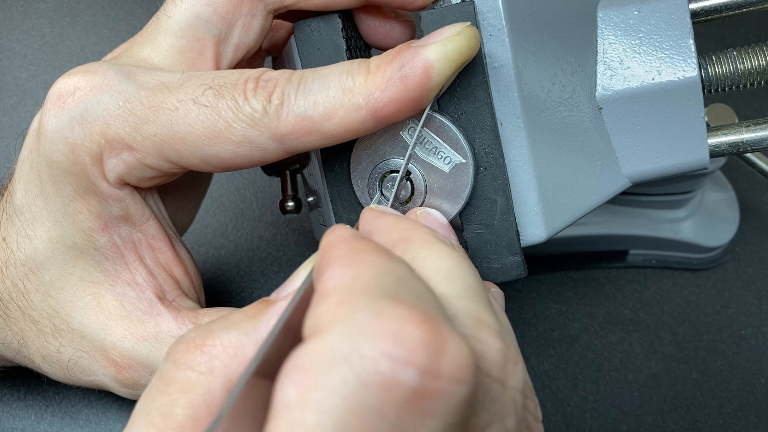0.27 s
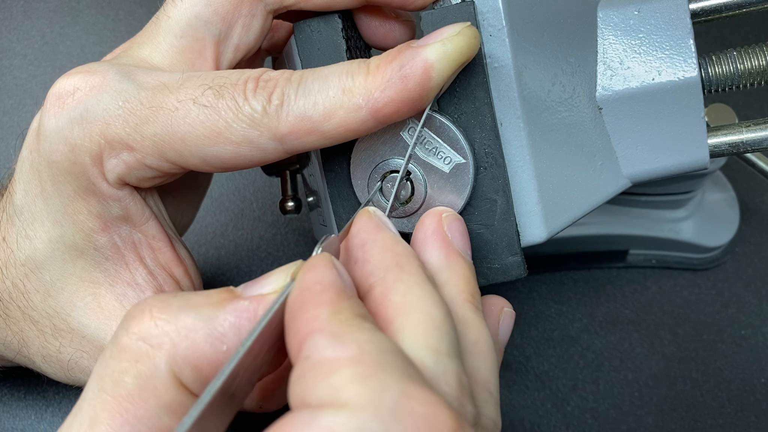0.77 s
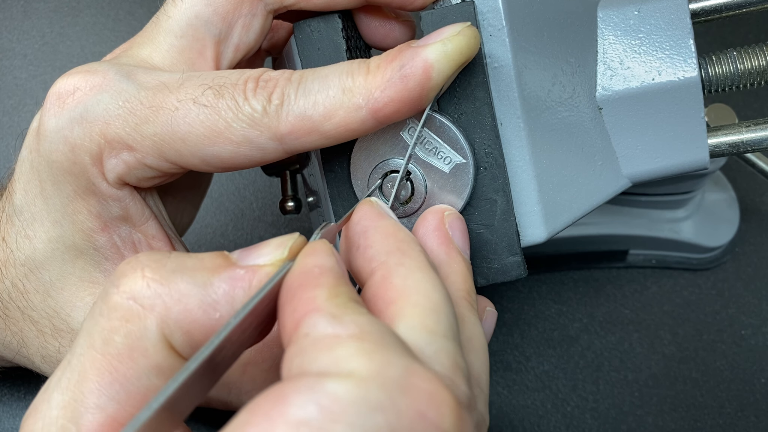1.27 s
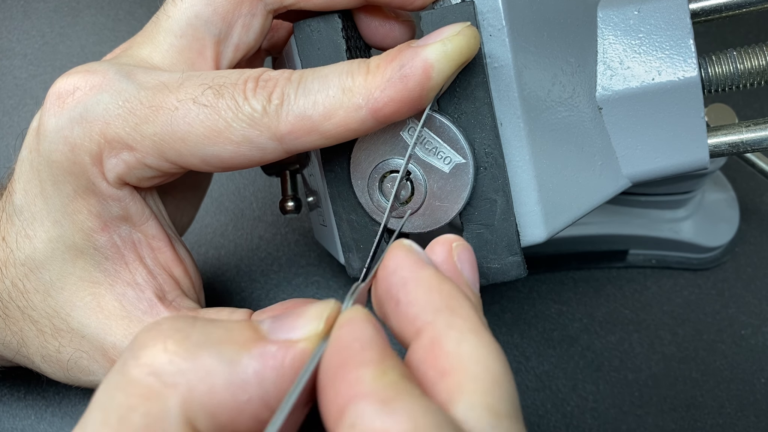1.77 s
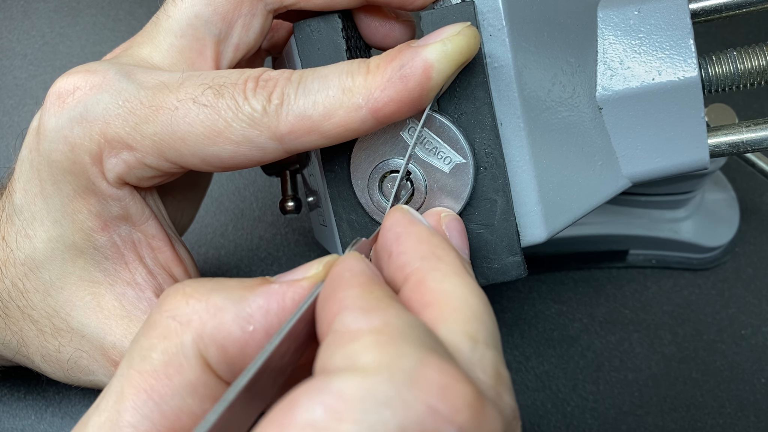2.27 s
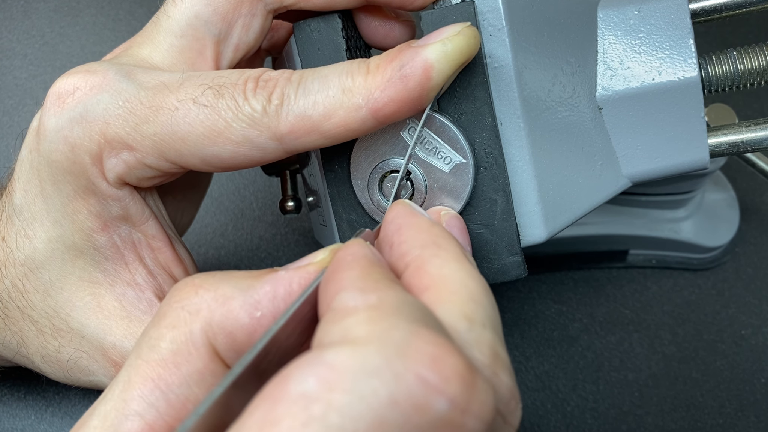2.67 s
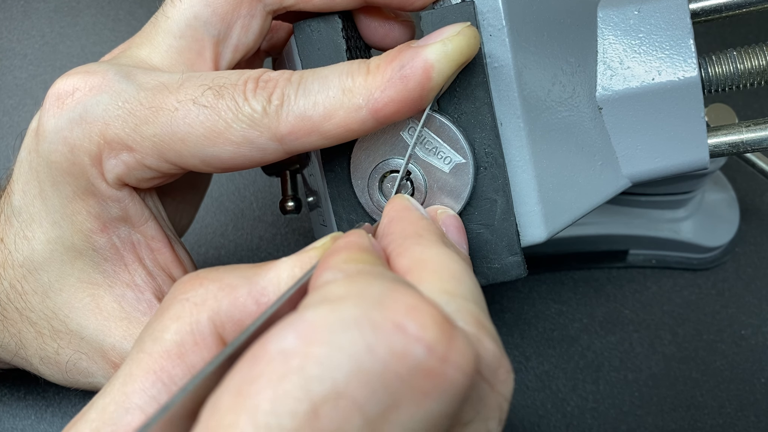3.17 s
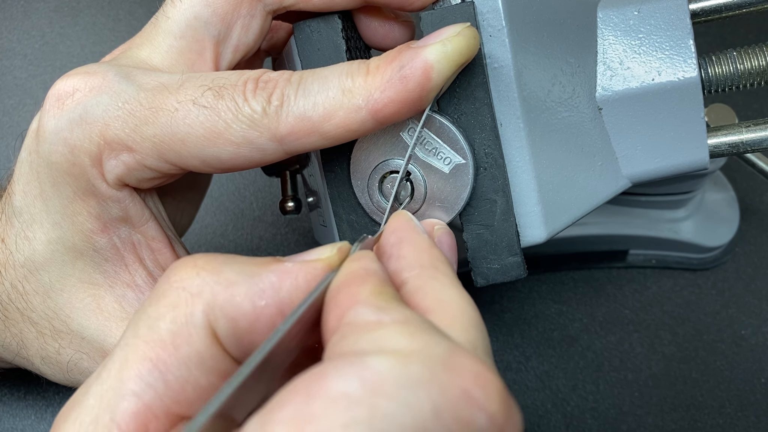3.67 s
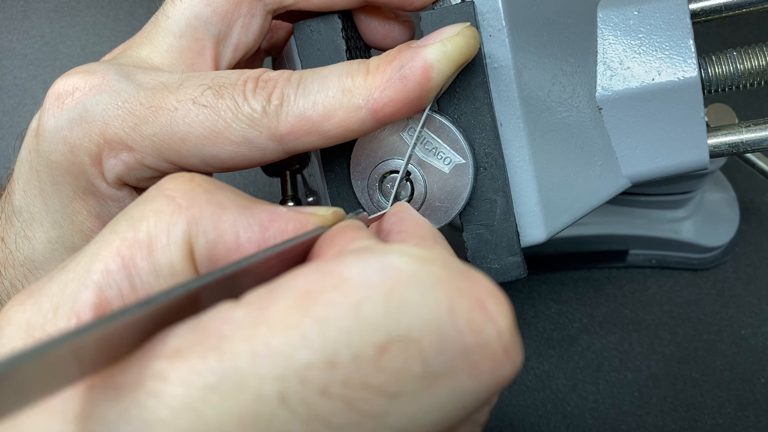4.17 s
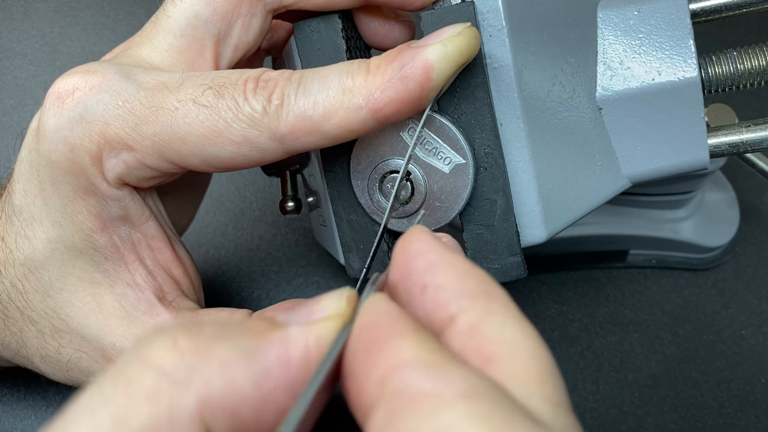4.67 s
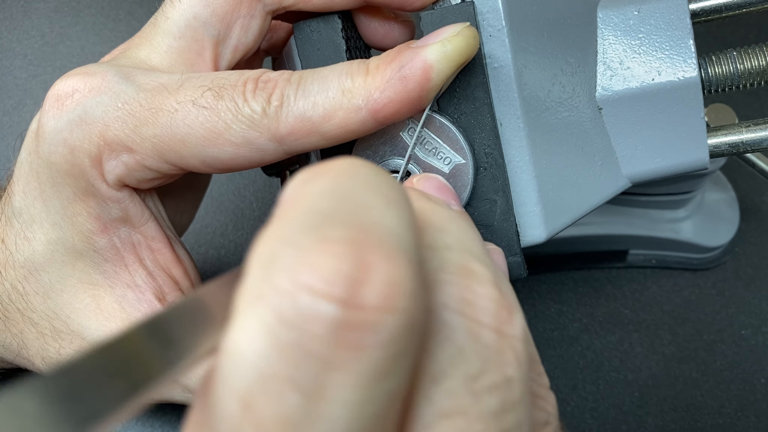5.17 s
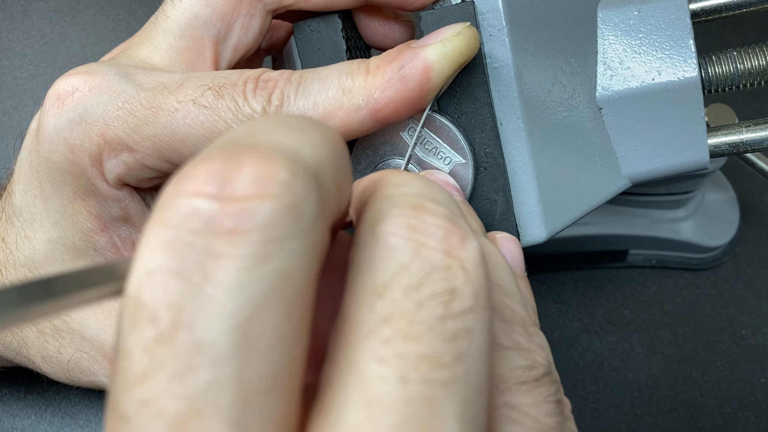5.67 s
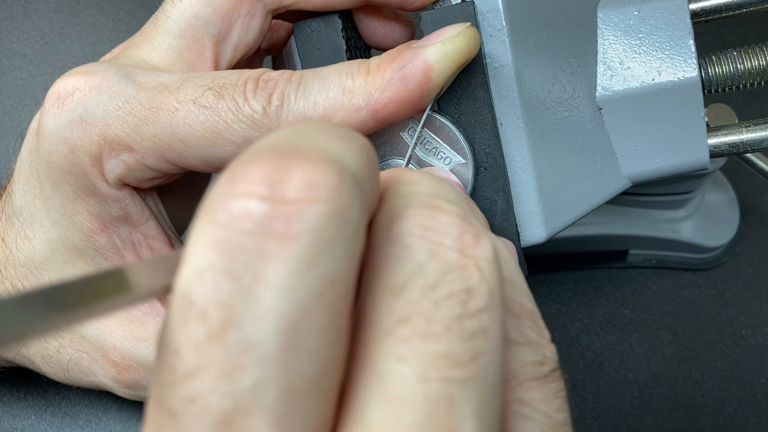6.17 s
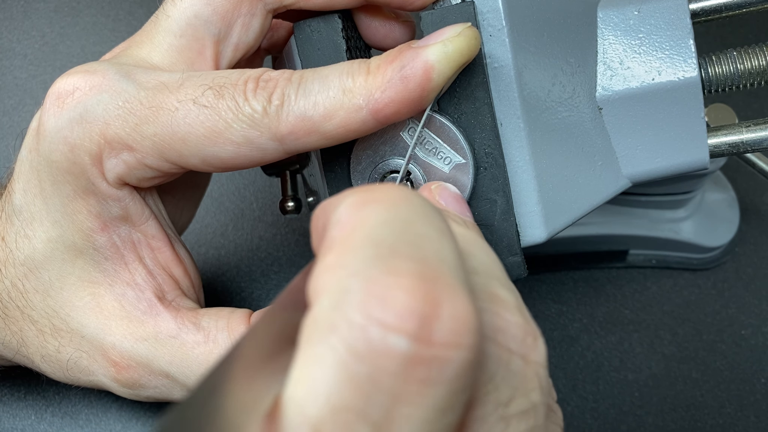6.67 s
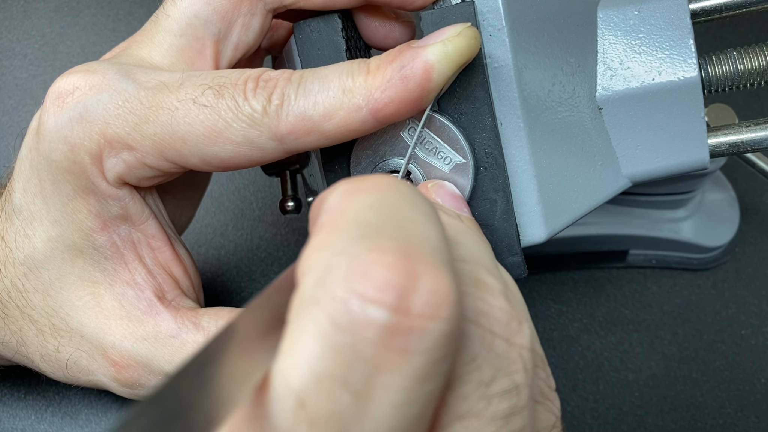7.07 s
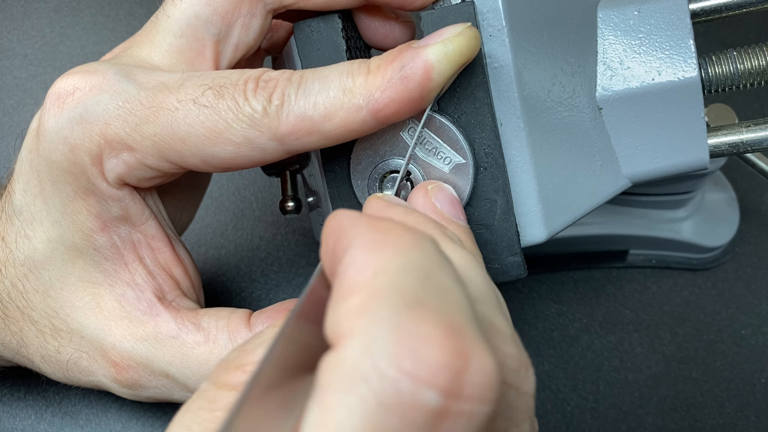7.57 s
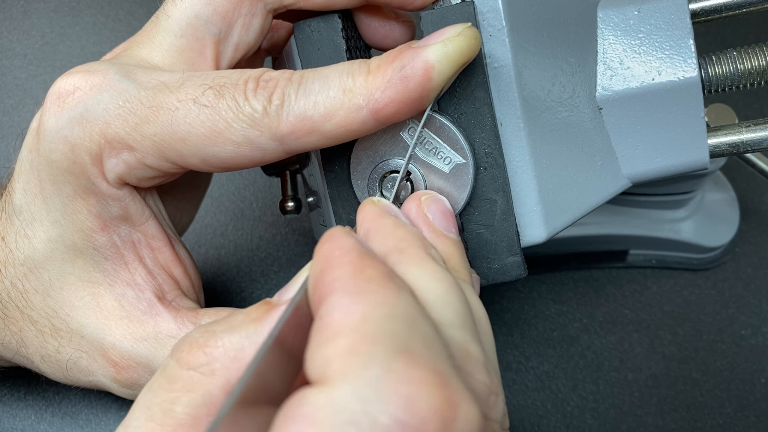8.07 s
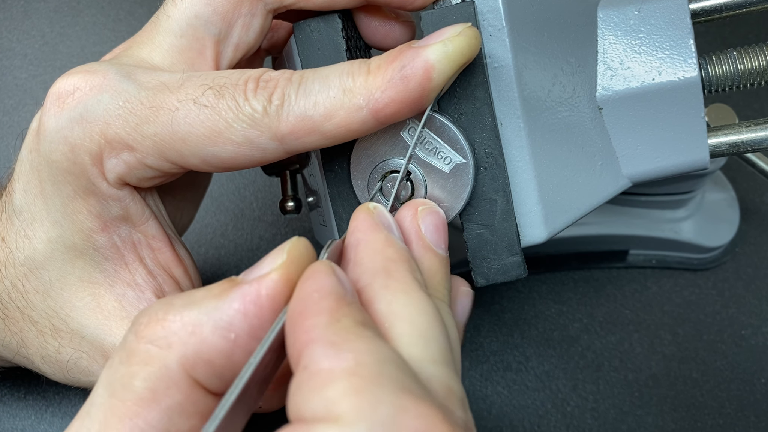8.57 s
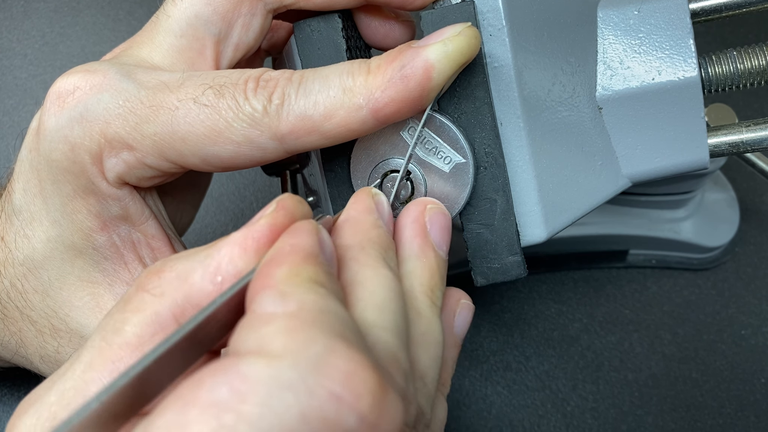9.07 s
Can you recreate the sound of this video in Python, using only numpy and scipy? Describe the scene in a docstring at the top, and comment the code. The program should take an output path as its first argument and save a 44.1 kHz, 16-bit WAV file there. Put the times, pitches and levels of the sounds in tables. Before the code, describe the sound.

Close to the microphone, a thin metal pick probes a clamped lock, making faint, uneven ticks and dull little knocks. Two short gritty scrapes come in the first half, among sharper clicks of pins snapping that resonate through the desk. The hardest click arrives late, followed by small taps and soft thuds of a hand against the vise. Steady room air and a faint low rumble lie beneath it all.

```python
"""Close on a small lock, clamped in a vise on a desk: quiet room air and the low rumble of hands.
Almost at once a pin snaps under the pick, a dry metal click that runs through the vise and sets the desk
booming briefly. Bright taps on the keyway follow, then dull nudges at pins that stay put. Near 2 s and
3.5 s the pick scrapes, sticking and slipping. From 4.3 s it gives way now and then, and the hand jolts
the vise. Snaps keep coming, the hardest at 7.2 s; a few last nudges, taps and soft thuds close the scene."""
import sys
import numpy as np
from scipy import signal
from scipy.fft import rfft, irfft
from scipy.io import wavfile
from scipy.ndimage import uniform_filter1d

SR = 44100
rng = np.random.default_rng(int(sys.argv[2]) if len(sys.argv) > 2 else 0)


def store_wav(level_fs):
    """Save 16-bit WAV to argv[1]."""
    pcm = np.round(np.clip(np.atleast_2d(level_fs), -1, 1) * 32767)
    wavfile.write(sys.argv[1], SR, pcm.T.astype(np.int16))


N = 411453

# Levels in the tables are balances, ahead of the trims in the functions.
# colour of the room air: f/Hz, density/dB
AIR_COLOUR = [(12, -25.5), (20, 0.5), (31, 6), (40, -2.5), (55, -6), (119, -9.5), (162, -28.5),
              (233, -17.5), (268, -19), (620, -34.5), (1280, -33), (1650, -36), (2800, -37), (5950, -39),
              (13000, -41), (15800, -42)]
# colour of the hand rumble: f/Hz, density/dB
RUMBLE_COLOUR = [(20, -20.5), (55, -7), (78, 6.5), (97, -22.5), (121, 4), (150, -6.5), (210, -11.5),
                 (400, -15.5), (1000, -25.5), (3000, -38), (16000, -78.5)]
# pins snap: t/s, vise knock/dB; then, relative to the knock, body clack/dB, pin tick/dB, desk thump/dB
SNAP_CUES = [(0.1768, -50, -5, -32, -4), (0.3473, -42, -9, -9, 1), (1.3457, -48, -7.5, -25, -4.5),
             (1.5305, -50.5, -1.5, 1, 5.5), (1.9582, -37, -20, -8, -6.5), (2.0114, -41.5, -10, -24, -9.5),
             (2.4201, -34.5, -12, -14, -7.5), (3.5226, -36, -18.5, -18, -7),
             (3.596, -30, -24.5, -18.5, -20.5), (3.9823, -39.5, -6, -16, -9.5),
             (4.3301, -34.5, -9, -20, -12), (5.475, -36, -10, -18.5, -5.5),
             (5.8009, -42, -9.5, -21.5, -5.5), (6.057, -27, -17.5, -21.5, 5),
             (6.9669, -38.5, -6.5, -25, -8.5), (7.24, -25.5, -2, -9.5, 1.5), (7.3622, -40, -5.5, -9, -3),
             (7.783, -42, -15, -13.5, -4), (8.0045, -50, -5.5, -38, -3.5), (8.2507, -46, -5, -11.5, 2.5),
             (8.7518, -47.5, -9, -11, -1)]
# ring of lock and vise: f/Hz, level/dB, t60/s
METAL_MODES = [(211, -5.5, 0.14), (356, -2.5, 0.035), (480.5, -1, 0.043), (536, -3.5, 0.043),
               (769, -12, 0.073), (880, -4.5, 0.075), (962.5, -7.5, 0.075), (1000, -8, .045),
               (1473, -7.5, 0.017), (1604, -2.5, 0.049), (1834, -9.5, 0.0276), (2045, -10.5, 0.039),
               (2310, -4, 0.033), (2833, -4.5, 0.016), (3100, -27, 0.019), (3970, -13.5, 0.018),
               (4445, -18, 0.022), (4930, -20.5, 0.015), (6090, -11.5, 0.021), (5980, -19, 0.014),
               (6850, -20.5, 0.04), (7600, -16.5, 0.0093), (9970, -25.5, 0.028), (11440, -19.5, 0.018),
               (12900, -26, 0.02)]
# the crowd of fast-dying modes in between: f/Hz, density/dB
CRACK_COLOUR = [(100, -40), (220, -1.5), (330, 1.5), (550, 1), (680, -1.5), (900, 6), (1270, -2),
                (1650, -1.5), (2050, -2), (2600, -14), (3900, -19), (4800, -24), (6400, -17.5),
                (9500, -33.5), (12500, -30.5), (16000, -32)]
# crossovers between vise, lock body, pin and pick: f/Hz
CROSSOVERS = [1250, 3700, 9200]
# boom of the desk: f/Hz, level/dB, t60/s, lag/s
DESK_MODES = [(121.04, -0.34, 0.38, .013), (76.7, -7, 0.34, 0.003), (173, -3, 0.068, 0.00012),
              (215.3, -25, 0.37, 0.0042)]
# decay of the room: f/Hz, t60/s
ROOM_DECAY = [(120, 0.91), (400, 0.29), (1000, 0.28), (3000, 0.21), (8000, 0.25), (16000, 0.37)]
# the tip strikes the keyway: t/s, tick/dB, knock/dB
TAP_CUES = [(0.212, -64.5, -57), (0.814, -71, -66.5), (1.571, -62.5, -55), (4.499, -51.5, -44.5),
            (4.537, -64.5, -53.5), (5.165, -55, -52.5), (5.635, -70, -58.5), (5.728, -66, -56.5),
            (6.159, -74, -51.5), (6.271, -67.5, -71), (6.703, -63, -59.5), (9.1897, -50.5, -45),
            (9.231, -55, -51.5)]
# the pick nudges a pin that stays put (the row at 7.373 s is the pick rebounding just after a snap): t/s,
# level/dB
NUDGE_CUES = [(0.887, -50), (0.922, -56), (0.967, -45), (1.078, -49.5), (1.149, -52), (1.255, -54),
              (1.624, -55.5), (2.827, -50.5), (5.887, -58), (7.373, -44.5), (7.703, -55.5), (8.576, -51.5),
              (8.665, -54.5), (8.706, -50), (8.907, -50.5), (8.946, -55), (9.066, -57)]
# the pick drags over a pin: t/s, length/s, groan/dB, grit/dB
SCRAPE_CUES = [(1.971, 0.082, -48, -68), (2.055, 0.015, -45, -61), (2.104, 0.013, -66, -62.5),
               (3.467, .05, -66.5, -67.5), (3.534, 0.012, -44, -72), (3.603, 0.0096, -41.5, -64)]
# the hand jolts the vise: t/s, thud/dB, thud f/Hz, swell/s, tip scratch/dB, wrench ring/dB
JOLT_CUES = [(4.325, -32, 55, 0.01, -48.5, -73), (4.33, -41, 194, 0.0064, -71, -70),
             (4.504, -39.5, 63.5, 0.01, -79, -80), (6.052, -29, 58.6, 0.0068, -56, -58),
             (7.2376, -25.5, 221, 0.0034, -34.5, -37.5), (8.753, -44, 70, 0.017, -70, -83),
             (9.231, -40.5, 68.6, 0.01, -72, -63), (9.287, -40, 73.8, 0.0039, -72, -83)]
# ring of the springy tension wrench: f/Hz, level/dB, t60/s
WRENCH_MODES = [(1600, -3, 0.11), (1800, -14, 0.047), (1980, -3.5, 0.056), (2170, -16, 0.14),
                (3010, 1, 0.036), (3200, 4, 0.043), (3300, -2, 0.063)]


def gain(db):
    """Decibels to gain."""
    return 10 ** (np.asarray(db) / 20)


def unit_rms(x):
    """Scales to rms 1."""
    return x / np.sqrt(np.mean(x ** 2) + 1e-20)


def punch(x):
    """Rms of the loudest three milliseconds."""
    return np.sqrt(uniform_filter1d(x ** 2, size=132).max() + 1e-20)


def curve_at(points, hz):
    """Reads a curve on a log-frequency axis."""
    f, value = np.transpose(points)
    return np.interp(np.log(hz + 1), np.log(f + 1), value)


def add(mix, s, sound):
    """Drops a sound into the mix at s seconds."""
    part = mix[max(round(s * SR), 0):][:len(sound)]
    part += sound[:len(part)]


def noise(colour, count):
    """Coloured noise of rms 1."""
    eq = gain(curve_at(colour, np.fft.rfftfreq(count, 1 / SR)))
    return unit_rms(irfft(rfft(rng.standard_normal(count)) * eq, count))


def air_and_hands(air_db=-60, hands_db=-65, wander_db=1):
    """The bed: steady room air and the wandering rumble of hands pressing on the vise."""
    t, rates_hz = np.arange(N) / SR, np.geomspace(0.379, 4, 12)
    wander = unit_rms(sum(np.sin(2 * np.pi * (hz * t + rng.random())) / np.sqrt(hz) for hz in rates_hz))
    air = gain(air_db) * noise(AIR_COLOUR, N)
    return air + gain(hands_db + wander_db * wander) * noise(RUMBLE_COLOUR, N)


def snaps(knock_hz=896.7, spread=0.044, usual_db=-42.5):
    """Pins give way. Each blow is: t/s, knock f/Hz, levels/dB of (vise, body, pin, pick), thump/dB."""
    blows = []
    for (s, db, clack, tick, thump), place in zip(SNAP_CUES, rng.standard_normal(len(SNAP_CUES))):
        glint = tick - 9 - 0.23 * (db - usual_db)  # the thin pick takes a smaller share of hard blows
        levels = db + np.array([0, clack, tick, glint])
        blows.append((s, knock_hz * np.exp(spread * place), levels, db + thump))
    return blows


def metal_ring(t, scatter_db, build_cycles=0.97):
    """Struck metal: the contact point shuffles the mode levels, and low modes bloom later."""
    hz, db, t60 = np.transpose(METAL_MODES)[:, :, None]
    share, phase, grip = rng.standard_normal((3, len(METAL_MODES), 1))
    # the high modes belong to the thin pick, whose free length changes with every move
    hz = hz * (1 + grip * np.where(hz > CROSSOVERS[1], 0.0094, 0.0017))
    attack = 1 - np.exp(-(t * hz / build_cycles) ** 2)
    decay = gain(db + scatter_db * share - 60 * t / t60)
    return (attack * decay * np.sin(2 * np.pi * (hz * t + phase))).sum(0)


def click(levels_db, knock_hz=880, crack_t60=0.074, seat_s=0.0037, seat_t60=0.011):
    """Ring, crack and knock of one hit, shared out in four bands: vise, lock body, pin and pick."""
    t = np.arange(SR // 10) / SR
    seating = (t > seat_s) * gain(-4 - 60 * abs(t - seat_s) / seat_t60)  # the pin lands a moment later
    attack = 1 - np.exp(-t / 0.0001)
    crack = noise(CRACK_COLOUR, len(t)) * attack * (gain(-60 * t / crack_t60) + seating)
    ring = metal_ring(t, scatter_db=5.5)
    # the heavy jaws, damped by the hand, swing only a few times
    knock = np.exp(-((t - 0.0031) / 0.0018) ** 2) * np.sin(2 * np.pi * knock_hz * t)
    hit = ring / punch(ring) + crack / punch(crack) + gain(3) * knock / punch(knock)
    bands = [(CROSSOVERS[0], "low"), (CROSSOVERS[:2], "band"),
             (CROSSOVERS[1:], "band"), (CROSSOVERS[-1], "high")]
    parts = [signal.sosfilt(signal.butter(4, hz, kind, fs=SR, output="sos"), hit) for hz, kind in bands]
    return sum(gain(db) * part / punch(part) for db, part in zip(levels_db, parts))


def lock_clicks(blows, trims_db=(-3, 0, 0, -1)):
    """Every blow clicks in the lock, with the vise and pick bands pulled back a little."""
    out = np.zeros(N)
    for s, hz, levels, _ in blows:
        add(out, s, click(levels + np.array(trims_db), hz))
    return out


def vise_hollow(x, dip_hz=1280, width_hz=260, depth_db=-13):
    """A scoop in the mids: at its antiresonance the vise hardly radiates."""
    notched = signal.lfilter(*signal.iirnotch(dip_hz, dip_hz / width_hz, fs=SR), x)
    return notched + gain(depth_db) * (x - notched)


def desk_boom(blows, trim_db=3, swell_s=0.0013):
    """The weight under the clicks: each blow shakes the desk, which swells just after the knock."""
    t, out = np.arange(SR // 2) / SR, np.zeros(N)
    boom = np.zeros(len(t))
    for hz, db, t60, lag in DESK_MODES:
        age = np.maximum(t - lag, 0)
        attack = 1 - np.exp(-age / swell_s)
        boom += attack * gain(db - 60 * age / t60) * np.sin(2 * np.pi * hz * age)
    for s, *_, thump in blows:
        add(out, s, gain(thump + trim_db) * boom)
    return out


def room_reverb(send, fade_in_s=0.0016):
    """A small furnished room: a short, diffuse tail in which the bass hangs longest."""
    hz, t, spectra = signal.stft(rng.standard_normal(SR // 2), SR, nperseg=256)
    tail = signal.istft(spectra * gain(-60 * t / curve_at(ROOM_DECAY, hz)[:, None]), SR)[1]
    tail *= 1 - np.exp(-(np.arange(len(tail)) / SR / fade_in_s) ** 2)
    return signal.fftconvolve(send, tail / np.linalg.norm(tail))[:N]


def taps(knock_hz=451):
    """Bright, hollow blows of the tip: body and pick follow the tick, the desk follows the knock."""
    return [(s, knock_hz, [knock, tick - 8, tick, tick - 0.5], knock + 1) for s, tick, knock in TAP_CUES]


def fidgets(per_s=4, level_db=-73, spread_db=3):
    """Tiny random touches of the pick inside the keyway, some duller than others."""
    out = np.zeros(N)
    for when, size, dull in rng.random((int(per_s * N / SR), 3)):
        rolloff_db = np.array([0, 4, 7, 11]) * (dull + 0.5)
        add(out, when * N / SR, click(level_db + spread_db * (2 * size - 1) - rolloff_db))
    return out


def nudges(knock_hz=766, spread=0.18, slip_s=0.0045, slip_hz=406, slip_db=-1.5):
    """Dull double blows, pitched by where the pick lands: it touches, slips and lands with a lower knock."""
    blows = []
    for (s, db), (place, delay) in zip(NUDGE_CUES, rng.uniform(-0.973, 1, (len(NUDGE_CUES), 2))):
        pitch = np.exp(spread * place)
        levels, thump = db + np.array([-2.5, -15, -23, -31]), db - 17
        blows.append((s, knock_hz * pitch, levels, thump))
        blows.append((s + slip_s * (1 + delay / 2), slip_hz * pitch, levels + slip_db, thump + slip_db))
    return blows


def scrapes(slips_per_s=700, uneven_db=3, bite_s=0.0091, ease_db_per_s=38, release_s=0.0077):
    """The pick sticks and slips; each slip rings the vise softly, and the hardest crackle with grit."""
    out, age, t = np.zeros(N), np.arange(SR // 10) / SR, np.arange(SR // 6) / SR
    groan_band = signal.butter(3, [500, 1050], "band", fs=SR)
    grit_colour = [(200, -17), (1500, -1), (4200, 7), (6800, 0), (9000, -5.5), (16000, -5.5)]
    for s, length, groan_db, grit_db in SCRAPE_CUES:
        # the drag bites, eases as the pin yields, and lets go
        release = np.exp(-np.maximum(t - length, 0) / release_s)
        pressure = np.minimum(t / bite_s, 1) * gain(-ease_db_per_s * t) * release
        slips = (rng.random(len(t)) < slips_per_s / SR) * gain(uneven_db * rng.standard_normal(len(t)))
        groan = signal.lfilter(*groan_band, metal_ring(age, scatter_db=2.5))
        grit = noise(grit_colour, len(age)) * gain(-60 * age / 0.022)
        for push, grain, db in ((slips, groan, groan_db), (slips ** 2, grit, grit_db)):
            texture = irfft(rfft(push) * rfft(grain, len(t)), len(t))
            add(out, s, gain(db) * pressure * unit_rms(texture))
    return out


def jolts(wrench_lag_s=0.00184, scratch_t60=0.018):
    """The tip skids off a pin with a short scratch, the wrench springs, the hand lands with a soft thud."""
    t, out = np.arange(SR // 4) / SR, np.zeros(N)
    wrench = sum(gain(db - 60 * t / t60) * np.sin(2 * np.pi * (hz * t + rng.random()))
                 for hz, db, t60 in WRENCH_MODES)
    for s, thud_db, thud_hz, swell_s, scratch_db, wrench_db in JOLT_CUES:
        thud = t / swell_s * np.exp(1 - t / swell_s) * np.sin(2 * np.pi * thud_hz * t)
        scratch = noise([(500, 6), (4500, -6), (6400, -5), (8500, -7), (15000, -10)], len(t))
        add(out, s, gain(thud_db) * thud + gain(scratch_db - 60 * t / scratch_t60) * scratch)
        add(out, s + wrench_lag_s, gain(wrench_db) * wrench)
    return out


def scene(lock_send_db=-10.5, desk_send_db=-17):
    """The mono mix: lock up front, desk underneath, a touch of room around both, all over the bed."""
    blows = snaps() + taps() + nudges()
    lock = vise_hollow(lock_clicks(blows) + scrapes() + fidgets()) + jolts()
    boom = desk_boom(blows)
    reverb = room_reverb(gain(lock_send_db) * lock + gain(desk_send_db) * boom)
    return (lock + boom + reverb + air_and_hands())[None]


def record(dry, cutoff_hz=15900):
    """A steep high cut on the whole mix."""
    high_cut = signal.firwin(511, cutoff_hz, window=("kaiser", 9), fs=SR)
    return signal.oaconvolve(dry, high_cut[None], "same")


dry = scene()
out = record(dry)
store_wav(out)
```